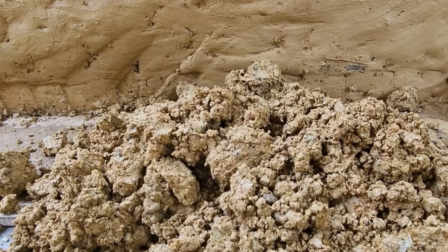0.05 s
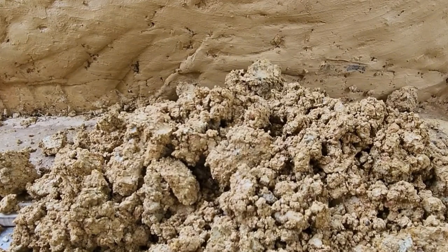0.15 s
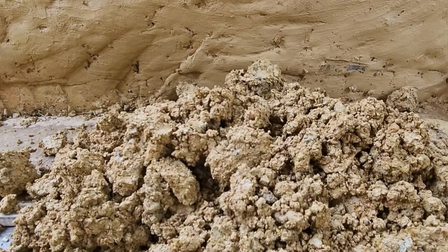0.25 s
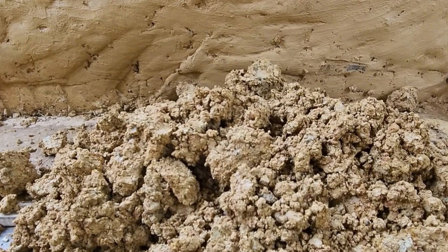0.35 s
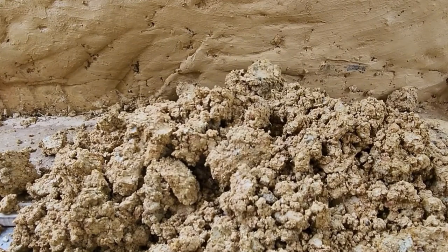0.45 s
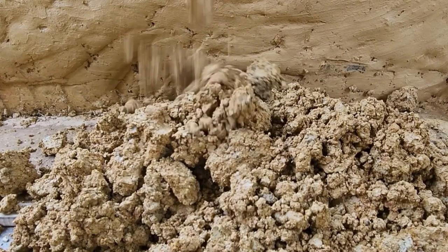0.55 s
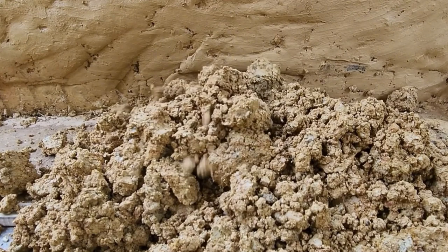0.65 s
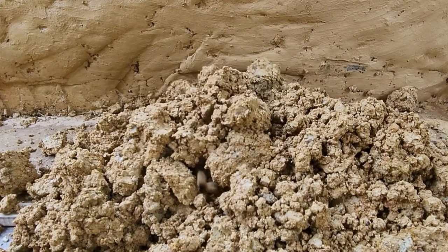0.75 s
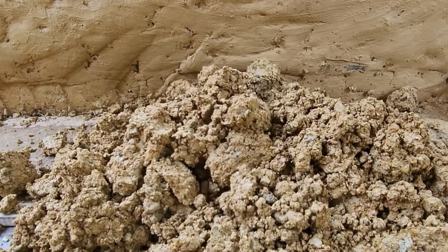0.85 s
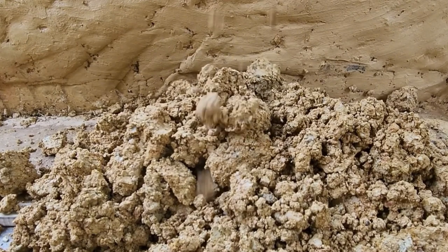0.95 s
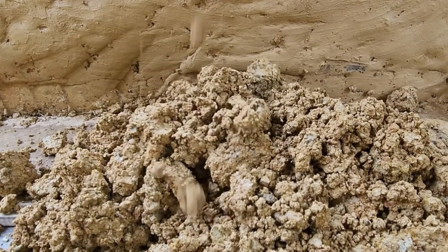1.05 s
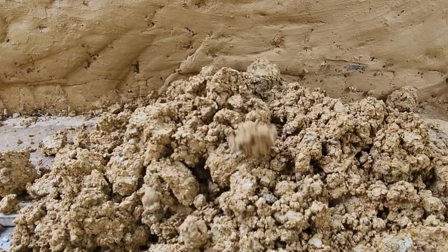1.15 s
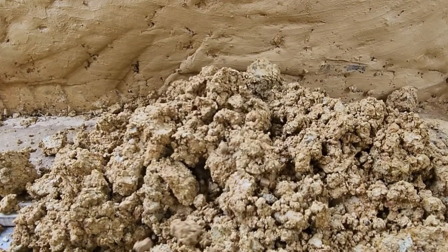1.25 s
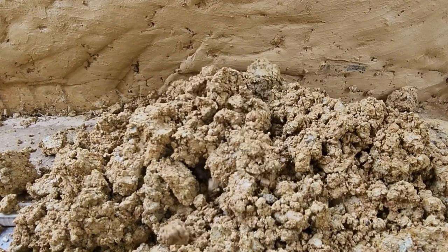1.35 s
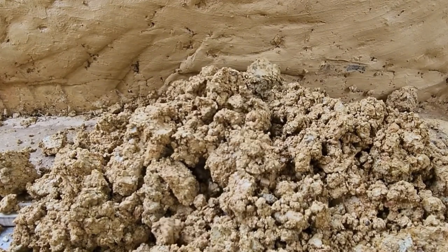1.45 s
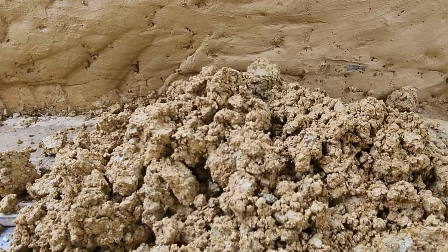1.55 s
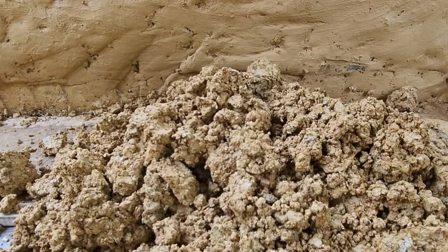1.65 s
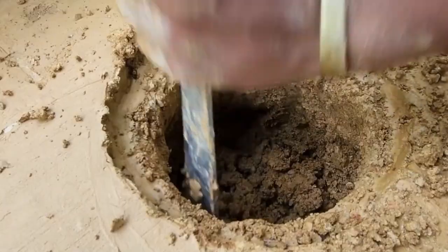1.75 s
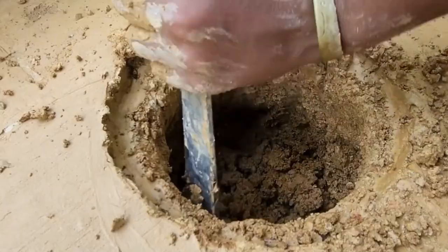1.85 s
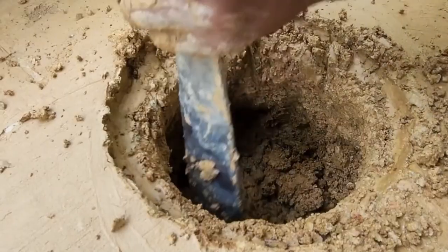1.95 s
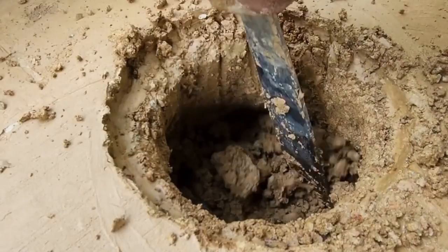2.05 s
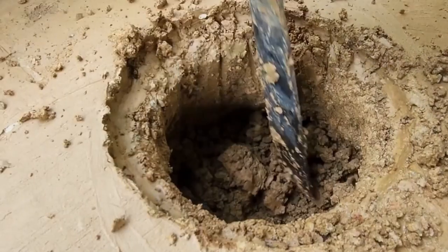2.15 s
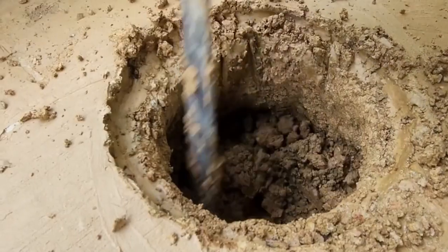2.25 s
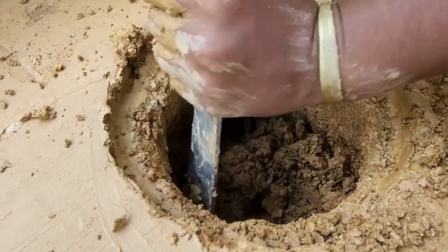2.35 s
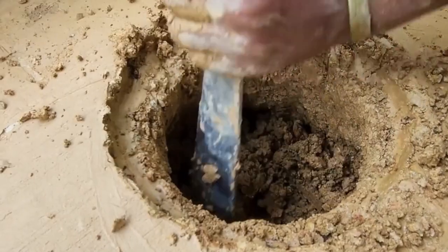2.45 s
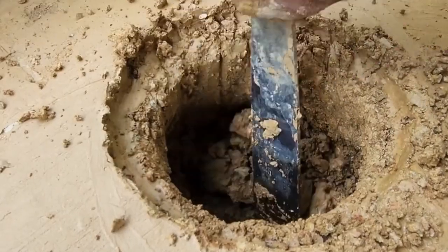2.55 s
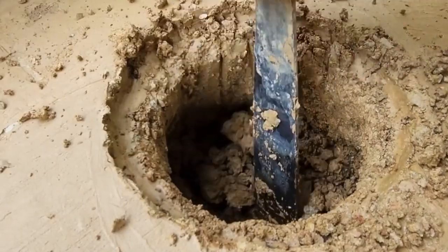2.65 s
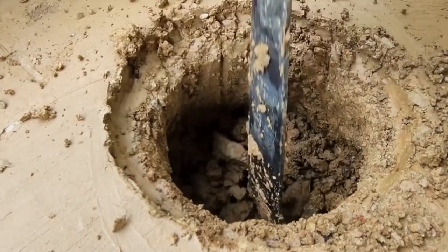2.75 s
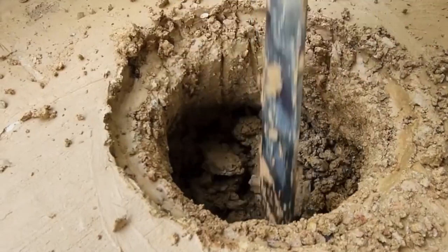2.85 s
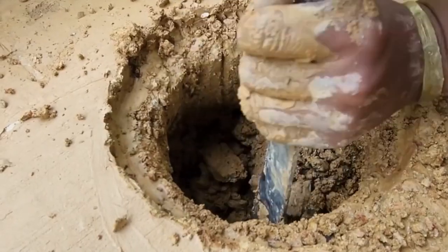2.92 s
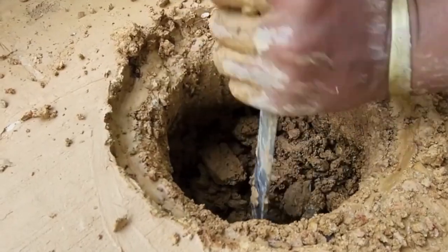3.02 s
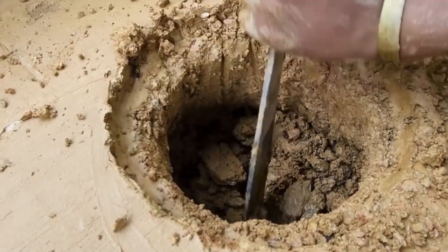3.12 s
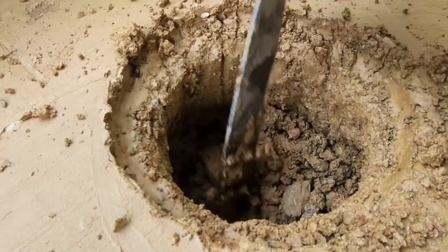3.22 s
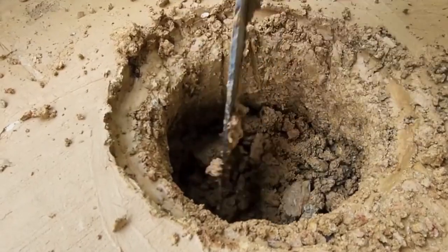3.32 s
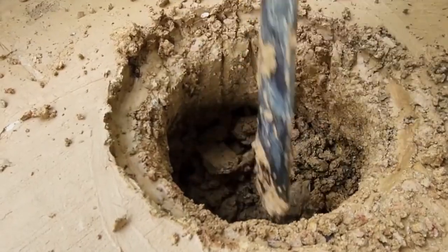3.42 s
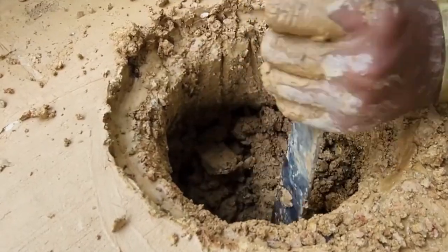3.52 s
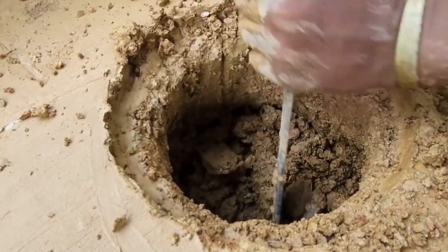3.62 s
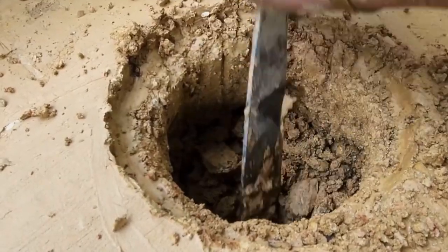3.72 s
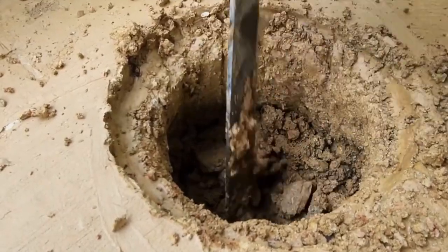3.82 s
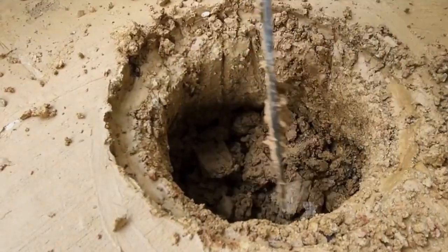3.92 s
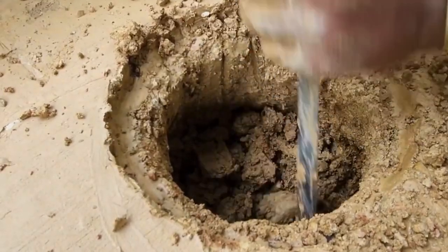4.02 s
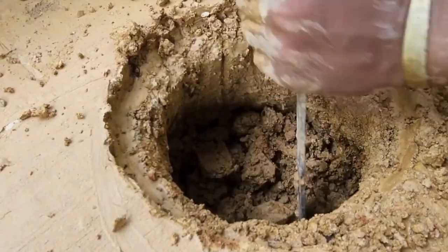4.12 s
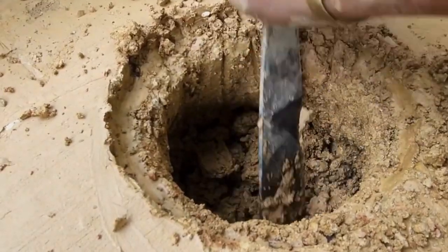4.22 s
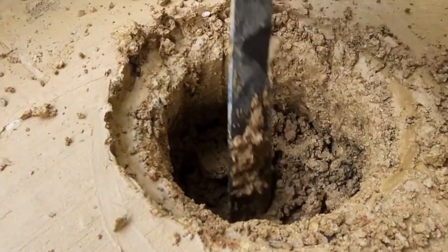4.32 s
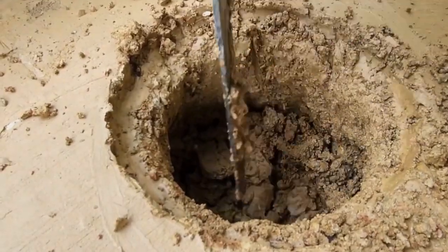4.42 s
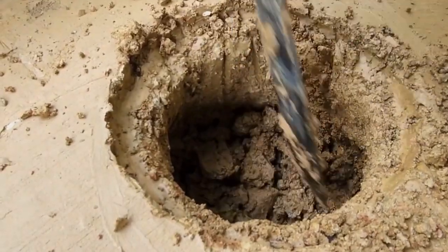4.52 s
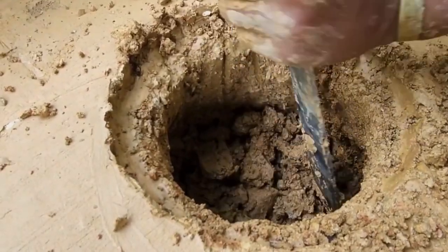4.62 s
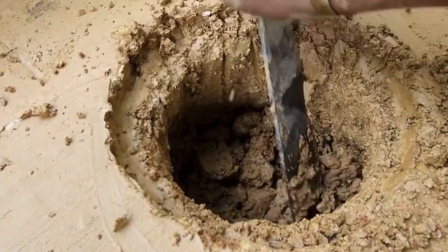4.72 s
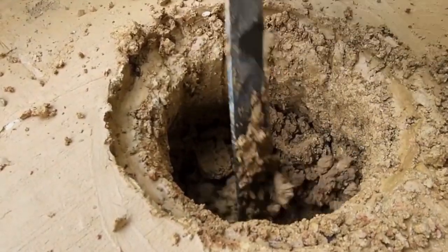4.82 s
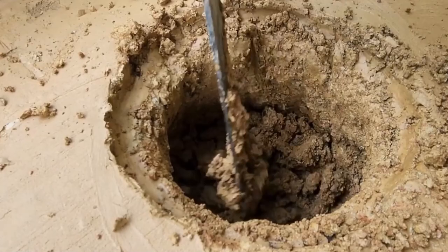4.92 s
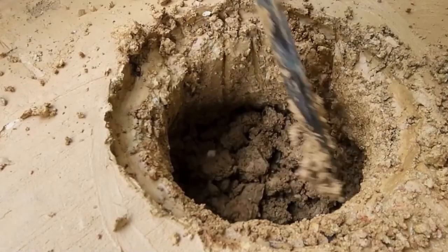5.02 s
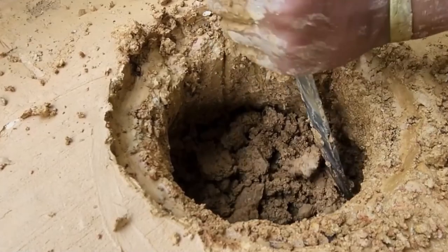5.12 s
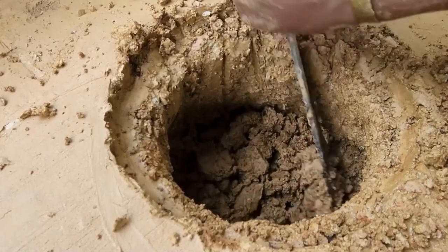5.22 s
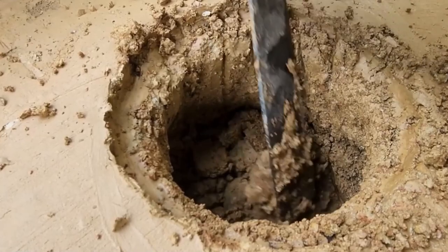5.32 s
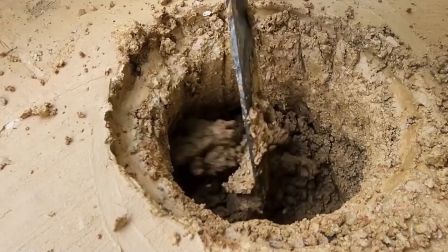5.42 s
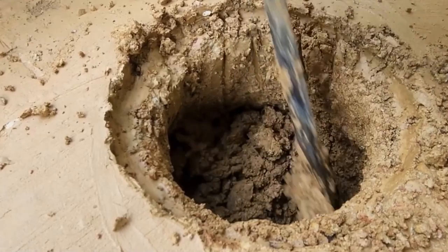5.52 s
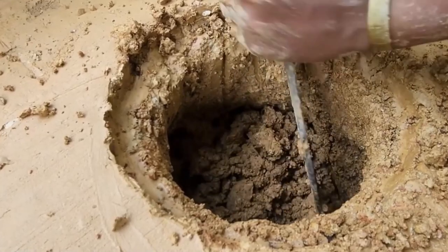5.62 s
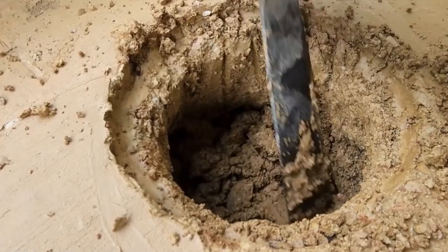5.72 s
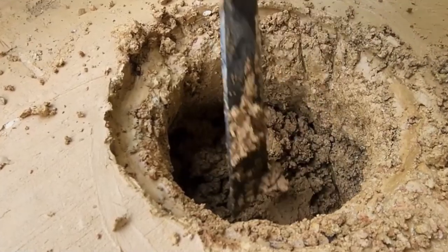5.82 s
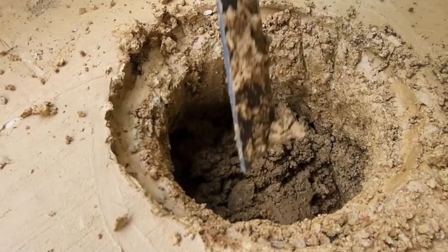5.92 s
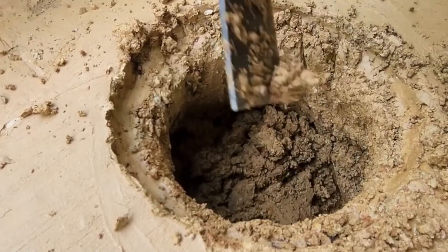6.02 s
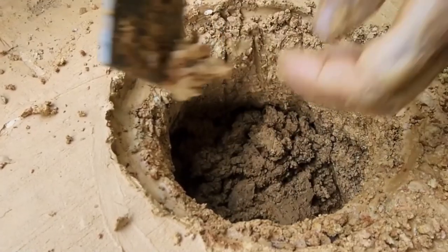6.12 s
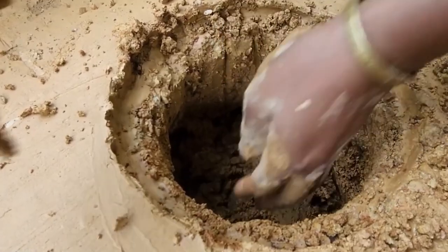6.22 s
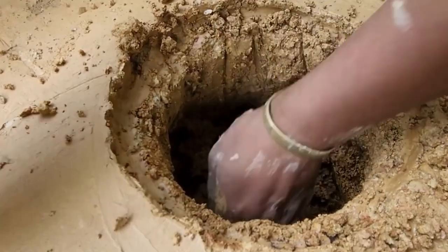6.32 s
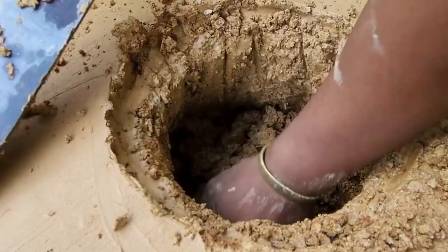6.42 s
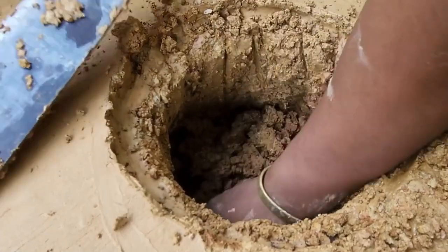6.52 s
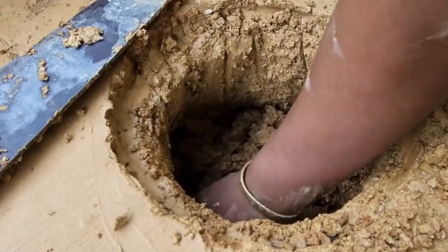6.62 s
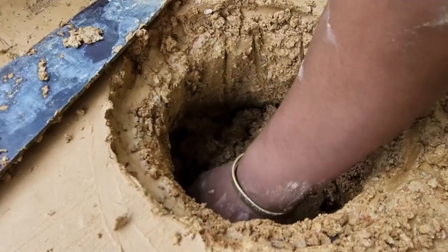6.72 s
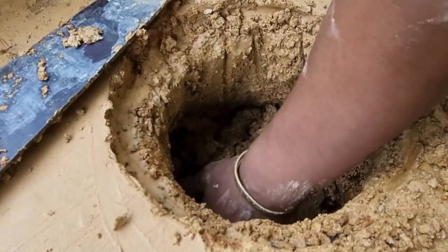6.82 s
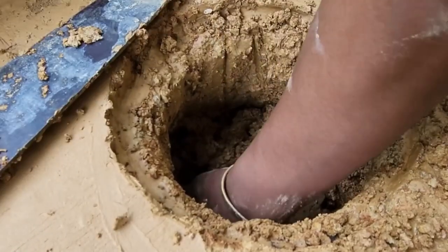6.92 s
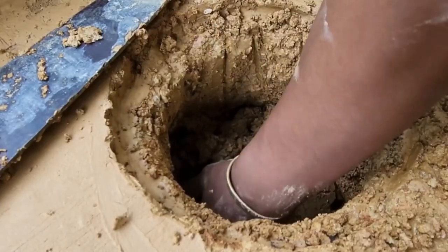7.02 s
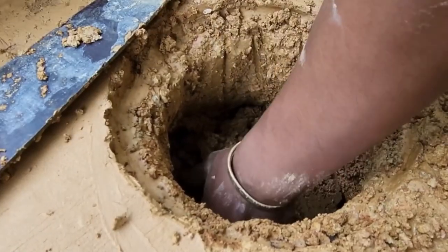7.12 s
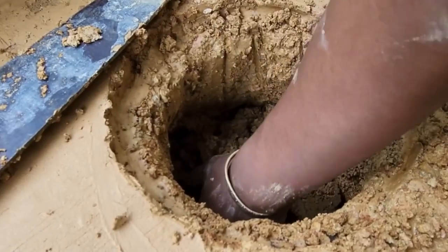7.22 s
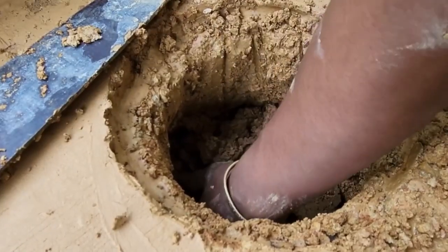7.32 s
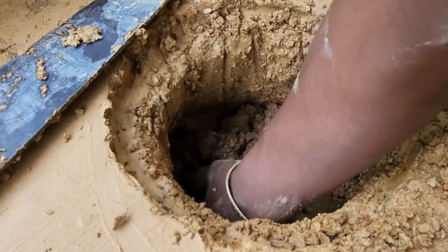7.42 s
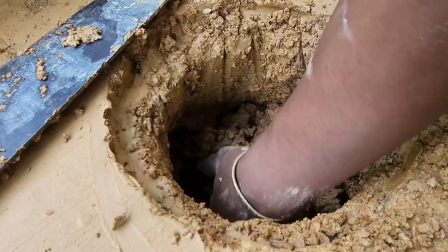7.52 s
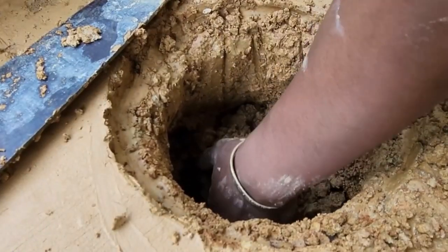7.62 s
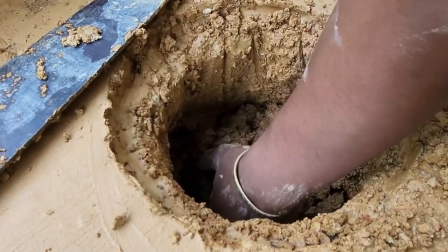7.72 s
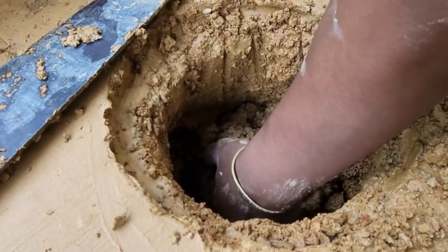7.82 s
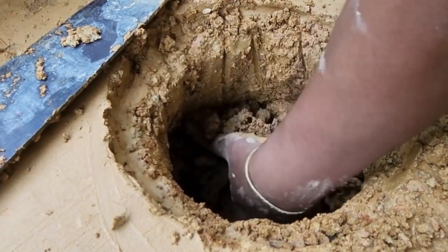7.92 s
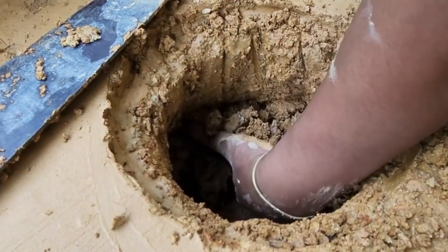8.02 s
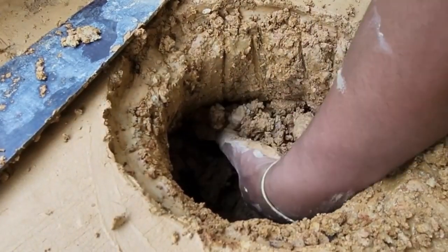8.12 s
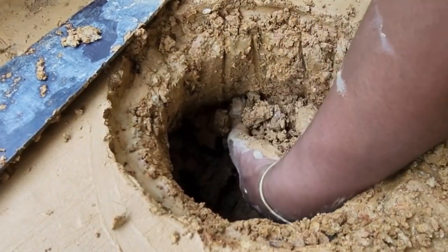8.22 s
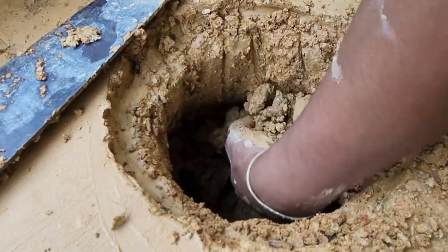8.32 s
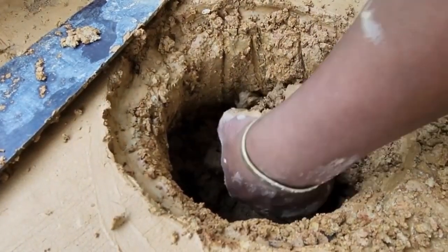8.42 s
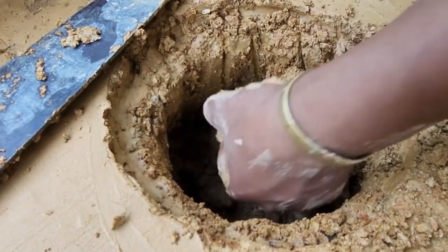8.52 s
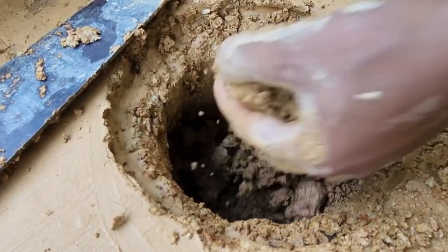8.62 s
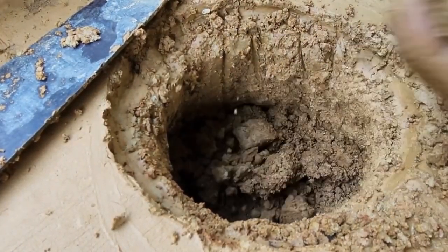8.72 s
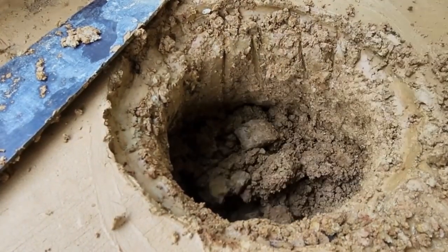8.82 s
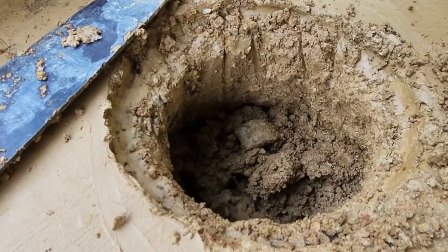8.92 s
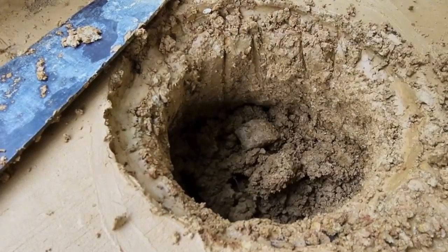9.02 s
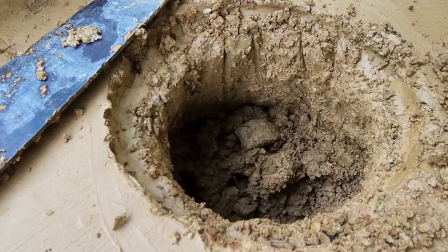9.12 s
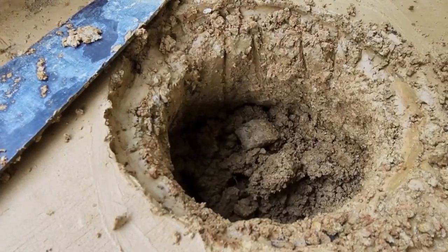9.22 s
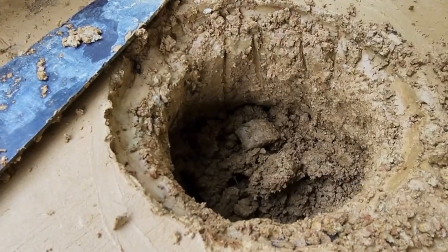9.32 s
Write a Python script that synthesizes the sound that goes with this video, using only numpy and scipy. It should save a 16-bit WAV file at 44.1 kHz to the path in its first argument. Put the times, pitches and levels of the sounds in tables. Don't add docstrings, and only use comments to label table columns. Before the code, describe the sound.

Outdoors in a forest, frogs throb and cicadas hiss steadily. Close to the microphone, a clod plops on a pile while a fly hums and leaves. Then a steel bar jabs clay in a small pit with gritty cracks, short metallic ticks and hollow low thuds, once hitting stone very loudly. After the last jab, only soft hand stirring and small crumb taps remain, with brief cricket trills.

```python
import sys
import numpy as np
from scipy import signal
from scipy.fft import rfft, irfft
from scipy.io import wavfile
from scipy.ndimage import uniform_filter1d

SR = 44100
rng = np.random.default_rng(int(sys.argv[2]) if len(sys.argv) > 2 else 0)


def boost(x):
    u = np.asarray(x, float) / 20
    return 10 ** u


def transcribe(signal):
    frames = np.atleast_2d(signal).T
    limited = np.clip(frames, -1, 1)
    pcm = np.round(limited * 32767).astype(np.int16)
    wavfile.write(sys.argv[1], SR, pcm)


N = 412776


def rms_one(x):
    return x / np.sqrt(np.mean(x ** 2) + 1e-20)


def in_time(rows):
    s, *columns = np.transpose(rows)
    return [np.interp(np.arange(N) / SR, s, c) for c in columns]


def drift(rate):
    r = np.exp(-80 * np.pi * rate / SR)
    slow = signal.lfilter([1], [1, -2 * r, r * r], rng.standard_normal(N // 40 + 2002))[2000:]
    return np.interp(np.arange(N) / 40, np.arange(len(slow)), rms_one(slow))


def ring(x, hz, t60):
    r = boost(-60 / (t60 * SR))
    w = 2 * np.pi * hz / SR
    return signal.lfilter([0, np.sin(w)], [1, -2 * r * np.cos(w), r * r], x + 1e-18)


def band(x, low_hz, high_hz, order=2):
    return signal.sosfilt(signal.butter(order, [low_hz, high_hz], "band", fs=SR, output="sos"), x)


def colour(x, spectrum):
    hz, db = np.transpose(spectrum)
    size = x.shape[-1]
    grid = np.maximum(np.fft.rfftfreq(size, 1 / SR), 1)
    return irfft(rfft(x) * boost(np.interp(np.log(grid), np.log(hz), db)), size)


def grains(shape, per_s, spread_db):
    sizes = boost(spread_db * np.minimum(rng.exponential(1, shape), 4)) * rng.choice([-1, 1], shape)
    return sizes * (rng.random(shape) < per_s / SR)


def add(out, s, piece):
    i = round(s * SR)
    out[..., i:i + piece.shape[-1]] += piece[..., :N - i]


def tilt(left_db, right_db):
    return boost([[left_db], [right_db]])


def at_pile():
    move_s = 1.9
    return np.clip((move_s - np.arange(N) / SR) / 0.1, 0, 1)


# start in seconds, peak in dB, ground over pit in dB, pit pitch in Hz.
JABS = [
    (2.38, -18, -24, 280),
    (2.981, -10.5, 4, 295),
    (3.5748, -14.5, 13.5, 255),
    (5.17, -17, 3.5, 281),
    (6.664, -20.5, 0.5, 246),
]
PUSHES = [(1.822, -27.5, -28, 255), (1.931, -34, 27, 250), (1.961, -22.5, -13, 283), (1.97, -22, -27, 280),
          (2.087, -33, -10, 285), (2.111, -37, -7, 246), (2.121, -28, -2, 246), (2.3303, -18.5, 9, 212),
          (2.338, -12, 7.5, 273), (2.37, -25, -13, 272), (2.3759, -23, -18, 268), (2.749, -39, 21.5, 247),
          (2.954, -24.5, 6, 232), (2.962, -17.5, 8, 232), (2.987, -17, 0.5, 278), (3.192, -30, -18, 235),
          (3.564, -23, 2.5, 277), (3.57, -23.5, 8, 277), (3.586, -24, 3, 300), (3.6039, -23, -16, 297),
          (4.079, -34, -3, 315), (4.102, -20, 3, 320), (4.109, -20.5, 13, 215), (4.1171, -13.5, 5, 221),
          (4.386, -32, 7, 305), (4.407, -38, -1, 295), (4.653, -20, 20.5, 290), (4.662, -12.5, 3, 274.5),
          (4.729, -23, 3, 270), (5.155, -22.5, 5, 215), (5.163, -18, -9, 235), (5.316, -30, -12, 295),
          (5.6489, -14, -43, 230.6), (5.6518, -23, -8, 301), (5.6598, -20, 4, 197.6), (5.699, -37, -8, 215)]
TAPS = [(0.627, -24, 16, 324), (6.013, -25.5, 22, 214), (6.04, -28, 33, 231), (6.168, -52, -3, 303),
        (6.447, -37.5, 14, 266), (6.536, -45.5, 7, 293), (6.882, -35.5, 12.5, 217), (7.687, -37.5, 27, 363),
        (7.929, -50, -9, 259), (8.175, -49.5, -5, 290), (8.222, -48.5, -13, 251), (8.372, -45.5, -14, 286),
        (8.474, -43, -17, 267), (8.619, -47, -9, 213), (8.72, -46, -29, 267), (8.768, -42.5, -22, 254),
        (9.311, -32, 11, 354)]
LUMPS = [(2.447, -45, -2, 266), (2.498, -38, -3, 260.6), (2.583, -40.5, -9, 254),
         (3.669, -43.5, 0, 267), (3.715, -48.5, 0, 296), (3.756, -47, 0, 264),
                (3.789, -52.5, 0.0037, 205),
         (4.214, -45, 0, 275), (4.259, -46.5, 0, 269), (4.298, -48.5, 0, 227), (4.348, -44, 0, 277)]
# mode in Hz, level in dB, t60 in seconds.
THUMP = [(71.2, -19, 0.089), (116.4, 11, 0.056), (148.5, 2.5, 0.074)]
PIT = [(260.4, 7.5, 0.061), (295, 11, 0.062)]


def thuds():
    bar_decay, tap_decay = 1.6, 2.3
    ground_share_db, pit_share_db, yield_db = -9, -4.5, -12.0
    out, push = np.zeros(N), np.zeros(SR // 4)
    push[:SR // 300] = -np.hanning(SR // 300)
    blow = band(push, 101, 187, order=1)
    rebounds = [(s + 0.01845, -17.5 + 0.56 * db, -1.5, hz) for s, db, _, hz in JABS]
    pushes = [(*row, bar_decay) for row in JABS + rebounds + PUSHES]
    pushes += [(*row, tap_decay) for row in TAPS + LUMPS]
    for s, db, lean_db, pit_hz, decay in pushes:
        ground_db = ground_share_db + min(lean_db, 0)
        pit_db = pit_share_db - max(lean_db, 0)
        ground = sum(boost(m_db) * ring(push, hz, t60 * decay) for hz, m_db, t60 in THUMP)
        pit = ring(push, pit_hz, 0.074 * decay)
        pit = pit + 0.69 * sum(ring(push, hz, t60 * decay) for hz, _, t60 in PIT)
        cycle = round(SR / pit_hz)
        early = band(pit, 120, 1000)[:2 * cycle] * np.hanning(2 * cycle) / np.abs(pit).max()
        add(out, s - cycle / SR, boost(db + pit_db + yield_db) * early)
        late = .0003 * max(-22 - db, 0)
        parts = ((ground, ground_db), (band(pit, 120, 1200), pit_db), (blow, min(db + 8.0, 0)))
        for swing, share_db in parts:
            add(out, s + late, boost(db + share_db - 4.5) * swing / np.abs(swing).max())
    return out


# start in seconds, peak in dB, loudest ring in Hz, ring share in dB,
# knock below 1 kHz in dB.
CRACKS = [(1.821, -25, 2580, -12, -40), (1.9653, -26, 7660, -6, -14), (2.03, -27, 7530, -6, -41),
          (2.3865, -19.5, 4640, -2, -24), (2.394, -32, 1640, 7, -24), (2.9567, -20.5, 7040, -11, -16),
          (2.9668, -23.5, 5460, -19, -8.5), (2.9777, -21.5, 3150, -8, -15), (3.176, -32.5, 1520, 0, -25),
          (3.196, -30.5, 3950, -28, -9.5), (3.5767, -15, 3930, -48, -31), (3.5828, -24, 7300, -15, -14),
          (4.091, -20, 2430, -13, -41), (4.1043, -23.5, 7500, 5, -13.5), (5.157, -26.5, 6960, -10, -11),
          (5.162, -28, 7760, -0.5, -19), (5.1708, -23, 4140, -8, -23), (5.6598, -25, 7100, -18, -10),
          (5.667, -25, 3000, 0, -12)]
SNAPS = [(2.3805, -14, 4930, -25, -34), (4.3891, -26.5, 2320, 5, -19), (4.4172, -31.5, 7300, 21, -43),
         (4.6635, -16, 3760, -14, -27), (4.723, -26, 2940, 1, -15), (5.6491, -15.5, 7040, -7.5, -5),
         (5.6537, -16.5, 2750, -7, -7.5), (6.6633, -25, 3230, -33.5, -8.5)]
STONE_HITS = [
    (4.0814, -2, 7200, -2, -16.5),
    (4.656, -20, 7660, -8.5, -28),
]
# frequency in Hz, level in dB per Hz.
GRIT = [(530, -74), (900, -4.5), (2480, 6), (4690, 7.5), (6110, 3), (7270, 6.5), (9050, 2.5), (12800, -3),
        (14200, -77)]
# mode in Hz, level in dB, t60 in seconds.
BLADE = [(2210, -3.5, 0.021), (2580, 13, 0.055), (3930, 1, 0.00167), (4330, 15.5, 0.006),
         (5560, 14.5, 0.017), (6900, -29, .012), (6750, 17.5, 0.017), (8600, -2, 0.0063), (8470, 20, 0.014)]


def cracks():
    out, t = np.zeros((2, N)), np.arange(SR // 8) / SR
    hits = [(*row, 0.065, .0027) for row in CRACKS]
    hits += [(*row, 0.044, .001) for row in SNAPS]
    hits += [(*row, 0.012, .0008) for row in STONE_HITS]
    for s, db, hz, ring_db, knock_db, t60, rise in sorted(hits):
        shape = (1 - np.exp(-t / max(rise, .0002))) ** 2 * boost(-60 * t / max(t60, .004))
        spray = grains(len(t), 4000, 2.5) * shape
        sides = spray + 1.2 * grains((2, len(t)), 3500, 3.5) * shape
        patch_db = rng.normal(0, 4.5 * min(t60 / .04, 1), 22)
        patches = np.transpose([np.geomspace(600, 13000, 22), patch_db])
        direct = rms_one(colour(colour(sides, GRIT), patches) * np.clip((.11 - t) / .03, 0, 1))
        strength = rng.normal(0, 3, len(BLADE))
        blade = rms_one(sum(boost(m_db + d) * ring(sides, m_hz, m_t60)
                            for (m_hz, m_db, m_t60), d in zip(BLADE, strength)))
        loudest = rms_one(ring(sides, hz, .01))
        crack = direct + 0.29 * blade + boost(ring_db) * loudest
        crack = crack / np.abs(crack.mean(axis=0)).max() * tilt(-1.5, 1.5)
        knock = band(spray + 0.6 * sides, 270, 900)
        knock = boost(knock_db) * tilt(2.5, -2.5) * knock / np.abs(knock).max()
        add(out, s - rise / 2, boost(db) * (crack + knock))
    return out


# start in seconds, peak in dB, low ring in Hz, high ring in Hz, high over low in dB.
TICKS = [(2.3809, -18.5, 4900, 7300, -4), (2.3862, -16.5, 4850, 7960, -15), (2.394, -22, 4360, 5170, -6),
         (2.4045, -26, 2670, 4600, -4), (2.396, -30, 1700, 2280, 7.5), (2.957, -22, 2940, 7100, 5.5),
         (2.9695, -39, 3300, 5100, 0), (2.9745, -30.5, 2000, 5500, 0), (2.9818, -26.5, 2600, 6370, 14.5),
         (3.5795, -17, 3930, 5240, -5.5), (3.584, -17.5, 4040, 7800, 4.5), (4.0822, -6.5, 2500, 7140, 2.5),
         (4.093, -25, 2400, 7200, -4), (4.1040, -19, 6700, 7400, 0), (4.106, -21.5, 7450, 8250, 4),
         (4.3882, -16, 2300, 3720, -10), (4.389, -24, 6340, 4570, -3), (4.3902, -25.5, 2240, 5500, 6),
         (4.42, -28.5, 7300, 7300, -5), (4.4300, -31, 8000, 7300, -4), (4.6640, -17.5, 3800, 5900, -6),
         (4.0824, -18, 1460, 3300, 1.5), (4.660, -26.5, 380, 460, -2), (4.669, -29, 2980, 3980, -6),
         (4.6755, -23.5, 3360, 4080, -6), (4.7260, -30, 2400, 2980, 8), (5.6497, -32, 3500, 6850, 6),
         (5.6526, -31, 1330, 4470, -3), (2.0330, -29, 2100, 7660, 6), (1.8220, -39, 415, 510, -9),
         (3.5700, -28.5, 454, 646, -13), (4.3883, -30, 360, 600, 0), (4.6600, -29.5, 424, 627, -10),
         (6.1700, -45, 377, 680, -3), (2.982, -25, 432, 560, -3), (6.666, -34, 432, 560, 6),
         (5.654, -29.5, 480, 600, -0.5), (0.631, -47, 430, 330, 0), (5.174, -28, 4020, 5700, 4),
         (5.195, -29.5, 2970, 8000, -9.5)]


def ticks():
    contact_s, low_t60_s, high_t60_s, bare_db = .0008, .016, .015, -6.5
    out, t = np.zeros((2, N)), np.arange(SR // 20) / SR
    for s, db, low_hz, high_hz, high_db in TICKS:
        contact = rng.standard_normal((3, len(t))) * t * np.exp(-t / contact_s)
        contact = contact[0] + 0.53 * contact[1:]
        low = rms_one(ring(contact, low_hz, low_t60_s))
        high = rms_one(ring(contact, high_hz, high_t60_s))
        bare = (low_hz > 1000) * rms_one(band(contact, 780, 6900))
        tick = low + boost(high_db) * high + boost(bare_db) * bare
        add(out, s, boost(db) * tick / np.abs(tick.mean(axis=0)).max() * tilt(-1.5, 1.5))
    return out


# start in seconds, length in seconds, level in dB above 7 kHz.
DRAG = [(0.053, 0.14, -54.5), (1.06, 0.13, -61), (1.932, 0.051, -46), (1.989, 0.088, -50.5),
        (2.299, 0.16, -48), (2.437, 0.12, -48.5), (3.126, 0.12, -42), (3.2, 0.16, -51.5),
        (3.613, 0.056, -59), (3.714, 0.12, -51.5), (3.787, 0.087, -45), (4.09, 0.062, -35),
        (4.215, 0.12, -67), (4.267, 0.11, -49), (4.377, 0.09, -46.5), (4.706, 0.076, -51.5),
        (5.119, 0.097, -48), (5.273, 0.11, -48.5), (5.64, 0.067, -55), (6.071, 0.083, -56),
        (6.628, 0.11, -62), (7.17, 0.073, -61)]
# frequency in Hz, level in dB per Hz.
SLIDING = [(500, -38.5), (1000, -10.5), (3000, -2.5), (6000, 2.5), (8000, 6), (10000, 0.5), (12800, -1),
           (14200, -71)]


def dragging():
    grit = colour(grains((2, N), 7000, 2.6), SLIDING) * boost(2.0 * drift(39))
    grit = grit + 1.9 * band(grit, 13000, 17500)
    stroke = np.zeros(N)
    for s, length, db in DRAG:
        add(stroke, s, boost(db + 4.5) * np.hanning(round(length * SR)))
    return stroke * grit / np.std(band(grit, 7100, 15000)) * tilt(-1.7, 1.7)


def swells(times, peaks_db, rise_db_per_s, fall_db_per_s, rest_db, hold_s=0):
    t = np.arange(0, N + 64, 64) / SR
    late = t - times[:, None]
    rise = np.minimum(rise_db_per_s * late, 0)
    fall = fall_db_per_s * np.maximum(late - hold_s, 0)
    db = peaks_db[:, None] + rise - fall
    return np.interp(np.arange(N) / SR, t, boost(db.max(axis=0)) + boost(rest_db))


# peak time in seconds, ground shake in dB, crumbs in the pit in dB.
HEAVES = [(0.1, -71, -79), (0.25, -72, -58), (0.42, -66, -64), (0.66, -41, -74), (0.72, -42.5, -72),
          (0.79, -48.5, -81), (1.15, -54, -67), (1.33, -61, -63), (1.852, -56, -58), (1.98, -51.5, -57),
          (2.14, -69, -64), (2.471, -47, -51.5), (2.84, -60, -97), (3.12, -46, -48), (3.7, -57.5, -52.5),
          (4.12, -44.5, -66), (4.27, -49.5, -58), (4.43, -68, -70), (4.7, -44, -53), (4.82, -50.5, -65.5),
          (5.317, -48, -60), (5.71, -41.5, -56), (5.8, -51, -71), (6.05, -44.5, -78), (6.17, -47.5, -76),
          (6.23, -50.5, -89), (6.39, -51.5, -88), (6.56, -52, -84.5), (6.7, -41.5, -88), (6.78, -47.5, -90),
          (6.85, -47, -81), (6.92, -52, -82), (6.97, -61, -85), (7.481, -63.5, -68), (7.97, -64, -64),
          (8.3, -72, -69.5), (8.68, -79, -68.5), (9.36, -46.5, -96)]
# mode in Hz, level in dB, t60 in seconds.
GROUND = [(68.9, -4, 0.098), (111, -2.5, 0.048), (170, 5.5, 0.013)]


def stirring():
    s, shake_db, crumb_db = np.transpose(HEAVES)
    heave = swells(s, shake_db, 147, 82.5, rest_db=-69.5, hold_s=0.014)
    slide = swells(s, crumb_db, 209, 130, rest_db=-82.5)
    tumble = boost(-26.5) * heave + boost(-16) * slide + boost(-85) + boost(-73) * at_pile()
    rumble = rng.standard_normal(N) * boost(1.2 * drift(17))
    shake = rms_one(band(sum(boost(db) * ring(rumble, hz, t60) for hz, db, t60 in GROUND), 32, 124))
    shake = shake + 0.14 * np.roll(shake, SR // 3) * [[1], [-1]]
    falls = grains(N, 90, 2.6)
    crumbs = rms_one(band(sum(boost(db) * ring(falls, hz, t60) for hz, db, t60 in PIT), 124, 620))
    clods = rms_one(band(grains((2, N), 1500, 3.0), 400, 950))
    return heave * shake + slide * crumbs + tumble * clods


# frequency in Hz, level in dB, time it is gone in seconds.
FLY = [(223, -66.5, 0.95), (354, -68, 1.17), (445, -68, 1.2), (556, -69, 2.1), (757, -77.5, 1.1)]


def fly():
    t = np.arange(N) / SR
    wobble = np.cumsum(1 + .016 * drift(3) + .022 * drift(25)) / SR
    hum = np.zeros(N)
    for hz, db, gone in FLY:
        leaving = np.clip((gone - t) / .25, 0, 1)
        hum += boost(db - 2 - 3.5 * t + 5 * drift(7)) * leaving * np.sin(2 * np.pi * hz * wobble)
    return hum


# start in seconds, length in seconds, pitch in Hz, level in dB.
CRICKET = [
    (5.057, 0.11, 4530, -45),
    (7.436, 0.18, 4400, -47),
    (7.986, 0.14, 4720, -48),
]


def cricket():
    out, blur = np.zeros(N), 1.2 * drift(40)
    for s, length, hz, db in CRICKET:
        t = np.arange(round(length * SR)) / SR
        trill = np.sin(np.pi * t / length) ** 0.19 * (1 - 0.3 * np.sin(np.pi * 45 * t) ** 2)
        flicker_db = 3 * np.repeat(rng.standard_normal(99), SR // 200)[:len(t)]
        tone = np.sin(2 * np.pi * hz * t * (1 - 0.09 * t) + blur[:len(t)])
        add(out, s, boost(db - 3.5 + flicker_db) * trill * tone)
    return out


def crowd(modes, per_s, spread_db, throb_db, throb_rate):
    out = np.zeros((2, N))
    for hz, width_hz, db in modes:
        r = np.exp(-np.pi * width_hz / SR)
        sos = [[1, 0.0087, -1.25, 1, -2 * r * np.cos(2 * np.pi * hz / SR), r * r]] * 2
        calls = signal.sosfilt(sos, grains((2, N), per_s, spread_db))
        out += boost(db + throb_db * drift(throb_rate)) * rms_one(calls)
    return rms_one(out)


# resonance in Hz, width in Hz, level in dB.
FROG_LOW = [(1203, 93, 0.5), (1332.5, 97, 2), (1520, 220, -5), (1751, 480, -7)]
FROG_HIGH = [(2510, 680, -8.5), (2773, 296, -0.5), (2970, 165, -1.5), (3162, 290, -3)]
# time in seconds, effort as level of the high throat band in dB.
FROGS = [(0.0, -46), (1.44, -46), (2.06, -50.5), (2.96, -48.5), (3.38, -44.5), (4.0, -46), (4.2, -50.5),
         (4.6, -47.5), (5.25, -44.5), (6.44, -53.5), (6.79, -50.5), (7.13, -46.5), (7.77, -44.5),
         (8.29, -56), (8.5, -67.5), (8.55, -55), (8.85, -47.5), (9.36, -48.5)]
# time in seconds, left over right in dB.
SIDE_OF = [(0.0, -1), (1.25, 1.5), (3.39, -6), (4.25, -2), (4.67, -6), (9.36, -6)]


def frogs():
    (high_db,), (side_db,) = in_time(FROGS), in_time(SIDE_OF)
    low_db = -46.5 + 1.29 * (high_db + 46) + 2 * at_pile()
    croak = boost(1.1 * drift(16.5))
    low = boost(low_db + 3) * crowd(FROG_LOW, 900, 2.2, 1.8, 7)
    low = low - 0.22 * low[::-1]
    high = boost(high_db + 3.5) * crowd(FROG_HIGH, 1500, 1.24, 1.5, 5)
    both = croak * (low * tilt(1.2, -1.2) + high * tilt(-1.5, 1.5))
    return both * boost(side_db / 2 * [[1], [-1]])


# resonance in Hz, width in Hz, level in dB.
CICADAS = [(4550, 120, -6), (7300, 900, 1), (7760, 720, 3), (8180, 110, -2.5), (8320, 560, 4),
           (8730, 1400, 6.5)]
# time in seconds, level in dB.
CICADA_LEVEL = [(0.0, -51), (1.68, -52), (2.06, -48), (5.3, -48.5), (6.0, -49), (8.9, -48.5), (9.36, -51.5)]


def cicadas():
    sink_from_s, sink_per_s = 4.6, 0.23
    choir = boost(in_time(CICADA_LEVEL)[0] + 3.5) * crowd(CICADAS, 6000, 3.5, 0.89, 22) * tilt(-1.5, 1.5)
    sink = np.clip(sink_per_s * (np.arange(N) / SR - sink_from_s), 0, 1)
    return (1 - 0.35 * sink) * choir + 0.6 * sink * band(choir, 6560, 8370)


# frequency in Hz, level in dB per Hz.
FAR_FOREST = [(24, -40), (40, -6.5), (183, -20.5), (264, -20), (372, -19), (922, -31), (1330, 4),
              (2070, -9.5), (2780, -3), (3300, 0), (5940, -3.5), (7970, -9.5), (11000, -14), (11800, -83),
              (14000, -70)]
# time in seconds, far forest in dB, leaf rustle in dB.
FAR = [(0.0, -54, -57), (0.49, -50.5, -53.5), (0.94, -51.5, -59), (1.64, -52, -57.5), (2.01, -51.5, -58.5),
       (6.8, -54, -61.5), (8.16, -54, -67.5), (8.5, -55, -72.5), (9.36, -53, -61.5)]


def far_forest():
    far_db, rustle_db = in_time(FAR)
    far = colour(rng.standard_normal((2, N)), FAR_FOREST)
    far = boost(far_db + 3.5) * far / np.std(band(far, 3280, 12000))
    leaves = rms_one(band(rng.standard_normal((2, N)), 8500, 11560))
    rustle = boost(rustle_db + 0.5 + 1.2 * drift(22)) * leaves * tilt(-1.2, 1.2)
    return (far + rustle) * tilt(-1.5, 1.5)


def scene():
    low = thuds() + fly()
    low = np.array([boost(3.0) * np.roll(low, 7), boost(2.0) * low])
    digging = low + cracks() + ticks() + dragging() + stirring()
    return digging + cricket() * tilt(1.5, -1.5) + frogs() + cicadas() + far_forest()


# frequency in Hz, usual level over the step in dB.
GATE = [(170, 14), (500, 6), (850, 4), (1200, 18), (1650, 9.5), (2200, 5), (3000, 14), (4000, 5), (5200, 4),
        (6300, 2.5), (7600, 9.5), (9000, 6.5), (10300, 1.5), (11000, -2), (11500, -6), (12000, -3)]
# frequency in Hz, rarity in spreads of chance.
DROPOUTS = [(900, 2.6), (1500, 2), (2000, 1.6), (2350, 1.7), (2500, 2.8), (3500, 2.4), (3570, 1.0),
            (3680, 1.0), (3760, 2), (4300, 2.2), (4650, 3), (5000, 1.8), (5500, 2.5), (6000, 1.6),
            (6450, 1.7), (6700, 2.3), (6900, 1.1), (7050, 1.1), (7250, 2.4), (8300, 2.8), (9000, 2),
            (9500, 1.2), (9800, 1.9), (10900, 1.9), (10910, .5), (11250, .5), (11260, 1.1), (11580, 1.1),
            (11600, -.9), (12250, -.9), (12300, -2)]


def gated(x):
    hop, lead = 1024, 2048 - 120
    both = np.array([x[0] + x[1], x[0] - x[1]]) / 2
    both = np.pad(both, ((0, 0), (lead, 3 * hop - (N + lead) % hop)))
    n, k = np.arange(2 * hop), np.arange(700)
    window = signal.windows.kaiser_bessel_derived(2 * hop, 4 * np.pi)[:, None]
    basis = window * np.sqrt(2 / hop) * np.cos(np.pi / hop * np.outer(n + .5 + hop / 2, k + .5))
    halves = both.reshape(2, -1, hop)
    cells = halves[:, :-1] @ basis[:hop] + halves[:, 1:] @ basis[hop:]
    hz = (k + .5) * SR / 2 / hop
    strip = uniform_filter1d(cells ** 2 + 1e-20, size=16, axis=2)
    calm = np.minimum(strip, np.median(strip, axis=1, keepdims=True))
    usual = np.exp(uniform_filter1d(np.log(calm), size=9, axis=1))
    chance = uniform_filter1d(rng.standard_normal(cells.shape), size=10, axis=2)
    chance = rms_one(uniform_filter1d(chance, size=3, axis=1))
    chance = rms_one(chance + chance.mean(axis=0))
    chance[..., hz > 10900] = np.repeat(chance[..., 506::32], 32, axis=2)[..., :194]
    step_db = 1.5 + 5.5 * chance - np.interp(hz, *np.transpose(GATE))
    step = np.sqrt(usual.max(axis=0)) * boost(step_db)
    keep = (chance + .85 < np.interp(hz, *np.transpose(DROPOUTS))) | (strip > 8 * usual)
    cells = keep * np.sign(cells) * np.floor(np.abs(cells) / step + .4) * step
    out = np.zeros_like(halves)
    out[:, :-1] += cells @ basis[:hop].T
    out[:, 1:] += cells @ basis[hop:].T
    mid, side = out.reshape(2, -1)[:, lead:lead + N]
    return np.array([mid + side, mid - side])


def low_pass(x):
    return signal.sosfilt(signal.butter(12, 14340, fs=SR, output="sos"), x)


def record(dry):
    dry = signal.sosfilt(signal.butter(3, 36, "high", fs=SR, output="sos"), dry)
    rounded = .62 * np.tanh(dry / .62)
    mix = gated(signal.sosfilt(signal.cheby2(10, 60, 14600, fs=SR, output="sos"), rounded))
    return low_pass(mix)


dry = scene()
out = record(dry)
transcribe(out)
```